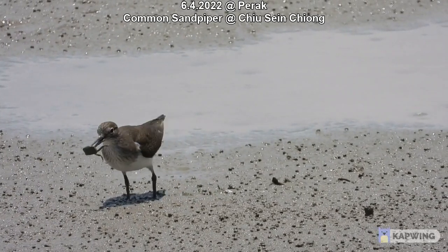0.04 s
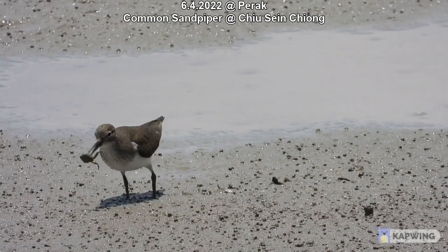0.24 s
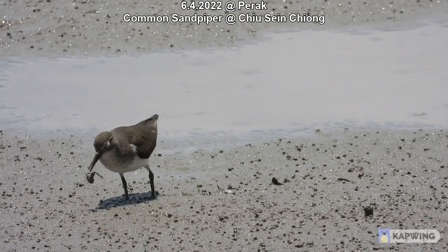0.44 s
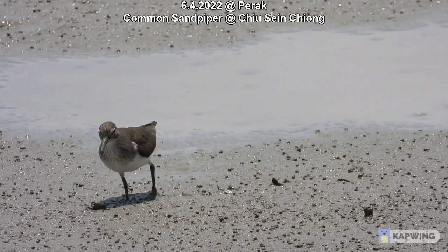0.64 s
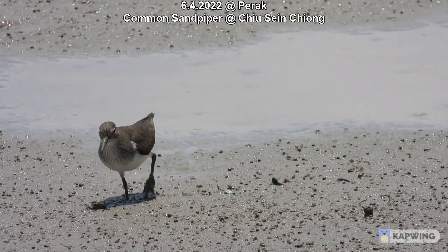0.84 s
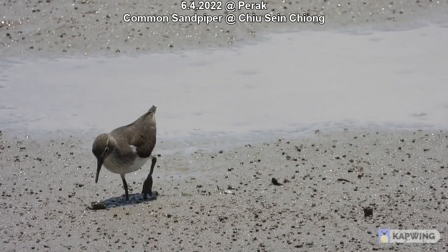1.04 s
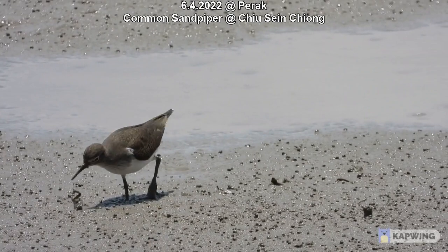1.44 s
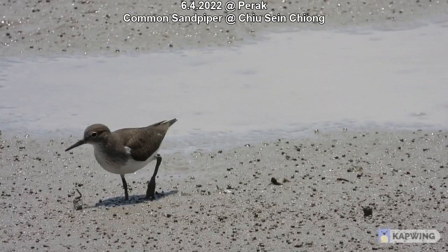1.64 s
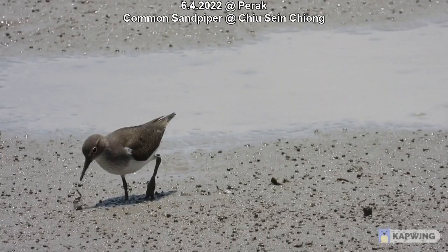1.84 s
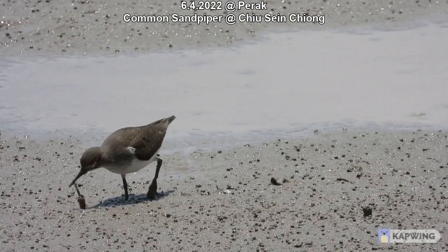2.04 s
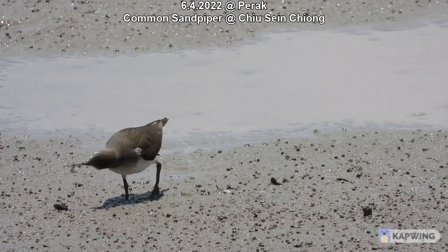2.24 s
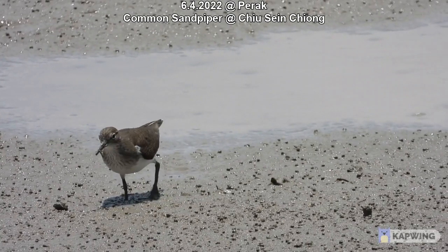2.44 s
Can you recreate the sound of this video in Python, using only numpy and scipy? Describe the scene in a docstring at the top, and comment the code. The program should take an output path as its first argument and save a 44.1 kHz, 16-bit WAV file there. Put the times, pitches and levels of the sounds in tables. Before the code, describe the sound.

A shorebird whistles three times in quick succession, each note falling with a slight echo, on an open mudflat. Small birds chip and chirp around it, while light wind bumps the microphone over a faint distant drone.

```python
"""On an open mudflat a shorebird gives three falling whistles, each trailed by a diffuse echo from
the bank. Other birds add a repeated chip with a rising answer, a hoarse chirp and two thin high notes;
every call is a frequency-modulated tone. Turbulent wind bumps the two microphone ports in turn.
Shaped noise makes a brief scuff, the soft rustle of the shore, a steady far drone and a faint hiss."""
import sys
import numpy as np
from scipy import signal
from scipy.fft import rfft, irfft, next_fast_len
from scipy.io import wavfile
from scipy.ndimage import map_coordinates

SR = 44100
rng = np.random.default_rng(int(sys.argv[2]) if len(sys.argv) > 2 else 0)


def to_wav(sig):
    """Store sig (one row per channel, or 1-D mono) as 16-bit WAV at the path in sys.argv[1].

    Samples outside -1..1 are clipped; the rate is SR.
    """
    pcm = np.clip(np.atleast_2d(sig), -1, 1) * 32767
    pcm = np.round(pcm).astype(np.int16)
    wavfile.write(sys.argv[1], SR, pcm.T)  # frames by channels


N = 114660
TIME = np.arange(N) / SR


# (onset [s], duration [s], first pitch [Hz], last pitch [Hz], upward bow [Hz])
WHISTLES = [(0.607, 0.2, 2302, 1405, -100), (1.031, 0.17, 2494, 1549, 185.5),
            (1.408, .169, 2570, 1573, 190.5)]
# one envelope per whistle (time [s], level [dB])
WHISTLE_LEVELS = [
    [(.612, -60), (.627, -48), (.636, -51.5), (.652, -40), (.662, -49.5), (.67, -47), (.802, -59)],
    [(1.033, -54), (1.046, -45), (1.06, -48.5), (1.072, -37), (1.086, -46.5), (1.094, -42), (1.125, -48),
     (1.144, -46), (1.2, -58.5)],
    [(1.408, -55), (1.421, -51), (1.43, -40), (1.44, -39.5), (1.452, -51), (1.466, -40.5), (1.484, -41),
     (1.577, -57.5)],
]

def whistles():
    """Amplitude modulation: each of the shorebird's falling tones swells several times, then fades."""
    calls = 0
    for (onset, length, first, last, bow), levels in zip(WHISTLES, WHISTLE_LEVELS):
        shape = [((at - onset) / length, db) for at, db in levels]
        call = note(onset, length, glide(first, last, bow), shape, waver=.006)
        calls += echoed(call, echo_db=-2, gap_s=.009)
    return panned(calls, pan_db=-2.5, lag_us=7.9)


# (onset [s], duration [s], first pitch [Hz], last pitch [Hz], level [dB], echo gain [dB])
CHIPS = [(0.445, 0.033, 3805, 2484, -55, 7), (0.941, 0.024, 3736, 2766, -50.5, 2.5),
         (1.377, 0.027, 3826, 2610, -48.5, 1), (1.882, .038, 3790, 2414, -52.5, 3),
         (2.299, 0.031, 3644, 2370, -46, -3.5)]
SLURS = [(.04, .08, 3415, 4380, -56.5, 4), (0.538, 0.075, 3016, 4297, -48.5, -3.5),
         (1.038, 0.079, 3250, 4174, -52, -1.5), (1.999, 0.06, 3540, 4455, -50, -1),
         (2.382, 0.078, 3100, 4277, -57, 5.5)]
# pitch contours (fraction of note, fraction of sweep)
CHIP_FALL = [(0, .03), (.17, 0.033), (1, 1)]
SLUR_RISE = [(0, 0), (.25, .32), (.55, .45), (.8, .93), (1, 1)]
# envelopes (fraction of note, gain [dB])
CHIP_SHAPE = [(0, -14), (.22, -4), (.7, -5), (1, -5.5)]
SLUR_SHAPE = [(0, -17), (.35, -13), (.58, -18), (0.839, -1.5), (1, -4)]

def small_birds():
    """Frequency sweeps: quick chips tip over and fall, and slurs climb in two steps."""
    def sweeps(notes, contour, shape, waver):
        calls = 0
        for onset, length, first, last, db, echo_db in notes:
            pitch = lambda u: first + (last - first) * line(contour, u)
            calls += echoed(amp(db) * note(onset, length, pitch, shape, waver), echo_db)
        return calls

    chips = sweeps(CHIPS, CHIP_FALL, CHIP_SHAPE, waver=.0179)
    slurs = sweeps(SLURS, SLUR_RISE, SLUR_SHAPE, waver=.023)
    return panned(chips, pan_db=-1.5, lag_us=34) + panned(slurs, pan_db=-2, lag_us=32)


# (onset [s], duration [s], first pitch [Hz], last pitch [Hz], level [dB])
RASP = (1.5, 0.06, 3699, 4301.5, -46.5)
# envelope (fraction of note, gain [dB])
RASP_SHAPE = [(0, -8), (0.379, 0.5), (.6, -10.5), (1, -12.5)]

def rasp():
    """Modulation sidebands: strong pitch jitter broadens a rising tone into a hoarse chirp."""
    onset, length, first, last, db = RASP
    call = amp(db) * note(onset, length, glide(first, last, bow=49), RASP_SHAPE, waver=.042)
    return panned(echoed(call, echo_db=-.5), pan_db=1.5, lag_us=-49)


# (onset [s], duration [s], top pitch [Hz], level [dB], echo gain [dB])
PEEPS = [(0.17, .061, 6486, -45, -7), (1.124, .05, 6950, -61.5, 9.5)]
# pitch contour (fraction of note, fraction of top pitch)
PEEP_ARCH = [(0, 0.8), (.15, 0.91), (.31, 1), (1, 0.77)]
# envelope (fraction of note, gain [dB])
PEEP_SHAPE = [(0, -23.5), (0.25, -4), (.6, -3), (1, -8.5)]

def peeps():
    """Nearly pure tones: thin high notes with little jitter flick up and slide down."""
    calls = 0
    for onset, length, top, db, echo_db in PEEPS:
        call = note(onset, length, lambda u: top * line(PEEP_ARCH, u), PEEP_SHAPE, waver=.0019)
        calls += echoed(amp(db) * call, echo_db)
    return panned(calls, pan_db=-2.5, lag_us=41)


# rumble at each port (time [s], level [dB])
WIND_LEFT = [(0, -87), (.23, -54), (.38, -51), (.43, -69.5), (1.03, -74), (1.09, -49.5), (1.22, -56.5),
             (1.3, -38), (1.44, -51), (1.56, -40.5), (1.73, -53), (1.8, -70.5)]
WIND_RIGHT = [(.17, -62.5), (0.269, -46.5), (.41, -39), (0.52, -44), (.57, -62.5), (.72, -68), (.79, -50),
              (1.0, -47), (1.25, -60.5), (1.64, -60.5), (1.73, -44), (1.79, -63.5), (2.0, -55), (2.06, -68)]
# (frequency [Hz], spectral level [dB])
WIND_SPECTRUM = [(25, -30), (80, -4), (170, 4), (250, -7.5), (380, -20.5), (1000, -63)]
# (peak time [s], settled pitch [Hz], level [dB], pan [-1 left, 1 right], decay time constant [s])
EDDIES = [(.195, 114.7, -37, 1, 0.012), (0.291, 150, -30.5, -0.84, 0.0055),
          (0.311, 185.1, -30.5, 1, 0.0087), (.369, 180, -29, -1, .004), (0.401, 160, -19, 0.99, 0.0089),
          (.834, 119.3, -29, 1, 0.0089), (1.073, 190.1, -39, 0.42, 0.004), (1.193, 146.1, -35, 0.8, 0.0075),
          (1.274, 185, -25.5, -1.1, 0.0064), (1.286, 140, -23, -0.97, .009), (1.33, 138.5, -31, -1, .016),
          (1.474, 126, -37.5, 1, .013), (1.712, 130, -36, -1, .008), (1.838, 160, -35.5, 0.98, .013)]

def wind():
    """Turbulent pressure: each port has its own rumble, and single eddies strike as damped low tones."""
    rise_s, sag_s, sag_log_ratio = .0033, .0029, .3
    level_db = np.array([line(port, TIME) + 2 * wobble(29.8) for port in (WIND_LEFT, WIND_RIGHT)])
    out = amp(level_db) * noise(WIND_SPECTRUM, coherence=[(100, .042)])
    for at, hz, db, pan, decay_s in EDDIES:
        before, after = np.minimum(TIME - at, 0), np.maximum(TIME - at, 0)
        swell = np.exp(-(before / rise_s) ** 2 - after / decay_s)
        pitch = hz * np.exp(sag_log_ratio * np.exp(-after / sag_s) + .12 * wobble(170))
        bump = amp(db) * swell * np.sin(2 * np.pi * np.cumsum(pitch) / SR)
        angle = (np.clip(pan, -1, 1) + 1) * np.pi / 4
        out += np.outer([np.cos(angle), np.sin(angle)], bump)
    return out


# (onset [s], duration [s], first pitch [Hz], last pitch [Hz], level [dB])
FAR_NOTES = [(0.544, 0.082, 2600, 2910, -54.5), (0.775, 0.043, 3175, 3350, -63.5),
             (2.0, 0.17, 5010, 4720, -64.5)]
# envelope (fraction of note, gain [dB])
FAR_SHAPE = [(0, -10.5), (1, -8.5)]

def far_birds():
    """Low direct-to-reverberant ratio: distant calls arrive mostly as echo."""
    calls = 0
    for onset, length, first, last, db in FAR_NOTES:
        call = note(onset, length, glide(first, last, bow=30), FAR_SHAPE, waver=.028)
        calls += echoed(amp(db) * call, echo_db=5)
    return calls


# (time [s], level [dB])
SCUFF_LEVEL = [(1.661, -79), (1.671, -55), (1.75, -60), (1.81, -77.5)]
# (frequency [Hz], spectral level [dB])
SCUFF_SPECTRUM = [(250, -23), (500, 3.5), (1100, 0.5), (6000, -48)]

def scuff():
    """Roughness: fast random amplitude modulation makes a short burst of low noise gritty."""
    grain_db = 3.5 * wobble(380)
    grit = unit(amp(grain_db) * noise(SCUFF_SPECTRUM, coherence=[(1000, .7)]))
    level_db = np.interp(TIME, *np.transpose(SCUFF_LEVEL), left=-np.inf, right=-np.inf)
    return grit * amp(level_db)


# (peak time [s], half duration [s], centre [Hz], width [octaves], level [dB])
RUSTLES = [(.122, 0.0014, 5720, 0.13, -58), (0.357, 0.17, 3980, .13, -69.5), (1.48, .087, 4730, .17, -67),
           (1.345, 0.037, 5700, 0.29, -63), (2.12, 0.071, 2730, 0.32, -61), (2.591, 0.013, 4990, 0.4, -57)]

def rustles():
    """Narrow-band noise under Gaussian envelopes: the shore rustles in short swells."""
    out = 0
    for at, half_s, centre, width, db in RUSTLES:
        white = noise([(1000, 0)], coherence=[(1000, .77)])
        band = filtered(white, lambda hz: np.exp(-(np.log2((hz + 1) / centre) / width) ** 2 / 2))
        out += amp(db) * np.exp(-((TIME - at) / half_s) ** 2) * unit(band)
    return out


# (frequency [Hz], spectral level [dB])
DRONE_SPECTRUM = [(640, -24), (725, -11), (772, -20.5), (797, -1), (835, 1.5), (865, -6), (900, -3),
                  (930, -12.5), (1150, -55.5)]
# (time [s], level [dB])
DRONE_LEVEL = [(0, -59.5), (1.5, -61.5), (1.92, -58), (2.08, -62), (2.17, -56), (2.26, -61.5),
               (2.44, -59.5)]

def far_drone():
    """Pitch from narrow-band noise: a far drone on the left swells and ebbs slightly."""
    band = noise(DRONE_SPECTRUM, coherence=[(800, .95)])
    return panned(band, pan_db=5.5) * amp(line(DRONE_LEVEL, TIME))


# (frequency [Hz], spectral level [dB])
AIR_SPECTRUM = [(25, -16), (80, -4), (180, 2.5), (350, -7.5), (520, 2.5), (680, -5), (1150, -4), (2200, -2),
                (4500, -8.5), (6300, -14.5), (10000, -34.5)]

def air():
    """Stationary broadband noise: a faint open-air hiss, partly coherent in the midrange."""
    hiss = noise(AIR_SPECTRUM, coherence=[(100, .035), (500, .45), (2500, .43), (6000, .05)])
    return amp(-61.5) * panned(hiss, pan_db=-1, lag_us=12)


# echo from the bank (frequency [Hz], reverberation time [s])
BANK_T60 = [(2200, 0.62), (4000, 0.41), (7000, 0.7)]

def echoed(x, echo_db, gap_s=0):
    """Diffuse reflection: dense near scatter and a decaying tail from the bank follow the direct sound."""
    scatter_db, scatter_s, coherence = 6, .0052, .67
    hz, t, spectra = signal.stft(rng.standard_normal((2, SR * 3 // 4)), SR, nperseg=256)
    fade_db = -60 * t / along(BANK_T60, hz)[:, None] + scatter_db * np.exp(-t / scatter_s)
    mid, side = signal.istft(spectra * amp(fade_db) * (t > gap_s), SR, nperseg=256)[1]
    angle = np.arccos(coherence) / 2
    tail = np.cos(angle) * mid + np.sin(angle) * np.array([side, -side])
    tail /= np.linalg.norm(tail[0])
    return x + amp(echo_db) * signal.fftconvolve(x[None], tail, axes=1)[:, :N]


def note(onset, length, pitch, shape, waver):
    """Frequency modulation: a bird tone's phase is the integral of its trembling pitch."""
    u = np.clip((TIME - onset) / length, 0, 1)
    hz = pitch(u) * (1 + waver * wobble(420.1))
    phase = 2 * np.pi * np.cumsum(hz) / SR
    edges = np.clip(20 * np.minimum(u, 1 - u), 0, 1)
    return np.sqrt(2) * edges * amp(line(shape, u)) * np.sin(phase)


def glide(first, last, bow):
    """Parabolic pitch contour over u, the elapsed fraction of a note."""
    return lambda u: first + (last - first) * u + bow * (1 - (2 * u - 1) ** 2)


def noise(spectrum, coherence):
    """Partial coherence: mid and side noise mix by (frequency [Hz], left-right coherence) points."""
    def response(hz):
        angle = np.arccos(along(coherence, hz)) / 2
        return amp(along(spectrum, hz)) * [np.cos(angle), np.sin(angle)]

    mid, side = filtered(rng.standard_normal((2, N)), response)
    return unit(np.array([mid + side, mid - side]))


def panned(x, pan_db, lag_us=0):
    """Level and time differences: left is louder than right by pan_db and later by lag_us."""
    half_s = lag_us / 2e6
    delayed = filtered(x, lambda hz: np.exp(2j * np.pi * np.outer([-half_s, half_s], hz)))
    return delayed * amp([[pan_db / 2], [-pan_db / 2]])


def filtered(x, response):
    """Linear filtering: the spectrum is multiplied by a frequency response."""
    size = next_fast_len(N + SR // 2)
    return irfft(rfft(x, size) * response(np.fft.rfftfreq(size, 1 / SR)), size)[..., :N]


def wobble(rate):
    """Smooth random modulation with rate knots a second."""
    return map_coordinates(rng.standard_normal(4096), [TIME * rate], mode="wrap")


def along(points, hz):
    """Interpolation on a logarithmic frequency axis."""
    frequencies, values = np.transpose(points)
    return np.interp(np.log(hz + 1), np.log(frequencies + 1), values)


def line(points, at):
    """Linear interpolation."""
    return np.interp(at, *np.transpose(points))


def amp(db):
    """Decibels to amplitude ratio."""
    return 10 ** (np.asarray(db) / 20)


def unit(x):
    """Normalisation to rms 1."""
    return x / np.sqrt(np.mean(x ** 2) + 1e-20)


def scene():
    """Superposition: the pressures of birds, wind and background add."""
    birds = whistles() + small_birds() + rasp() + peeps() + far_birds()
    return birds + rustles() + scuff() + wind() + far_drone() + air()


def record(dry):
    """Band limiting: the microphone thins the deepest rumble and passes nothing above top_hz."""
    low_hz, top_hz = 98.6, 9900
    thinned = signal.sosfilt(signal.butter(2, low_hz, "highpass", fs=SR, output="sos"), dry)
    return filtered(thinned, lambda hz: hz < top_hz)


dry = scene()
out = record(dry)
to_wav(out)
```